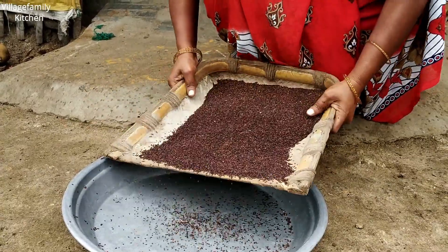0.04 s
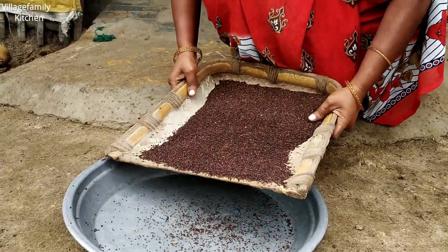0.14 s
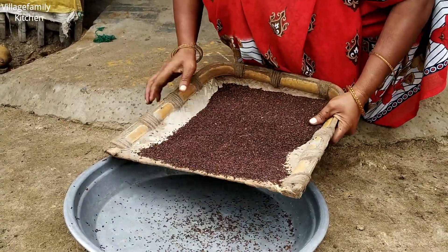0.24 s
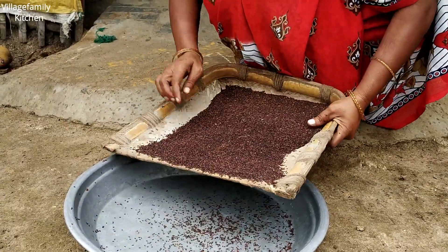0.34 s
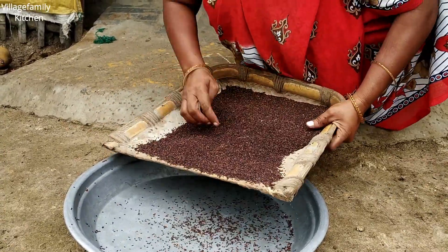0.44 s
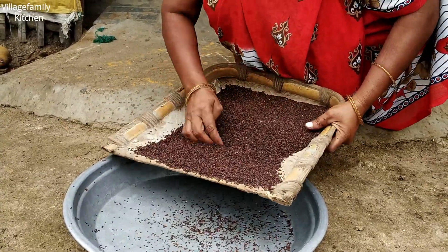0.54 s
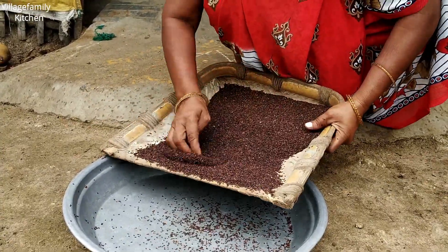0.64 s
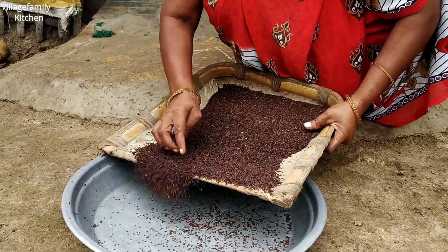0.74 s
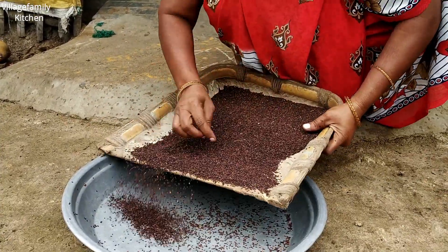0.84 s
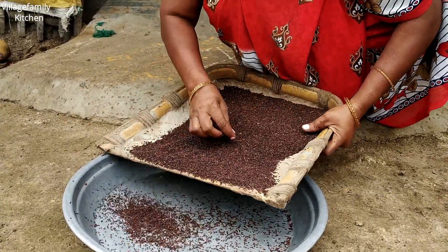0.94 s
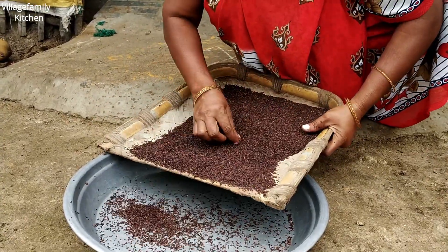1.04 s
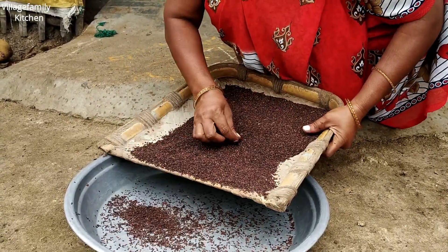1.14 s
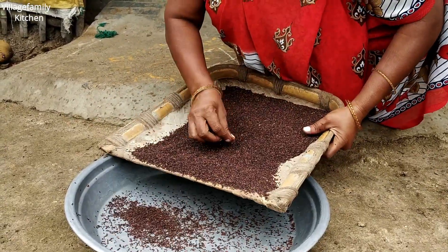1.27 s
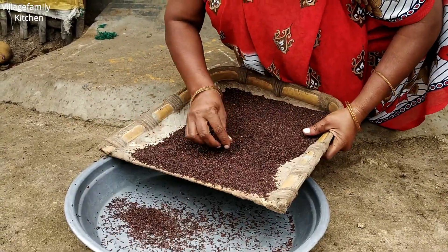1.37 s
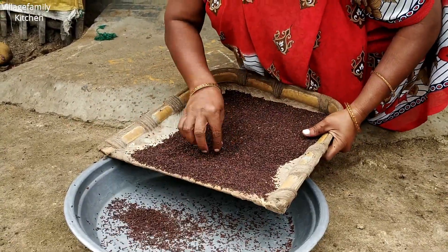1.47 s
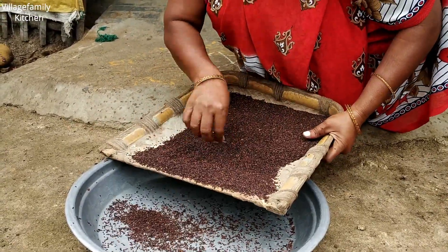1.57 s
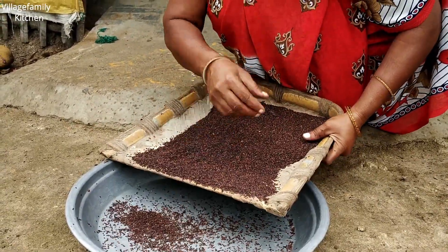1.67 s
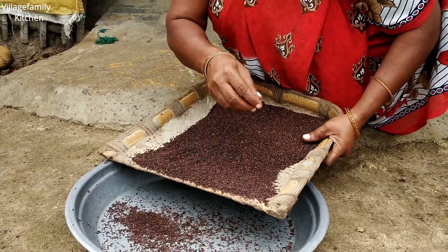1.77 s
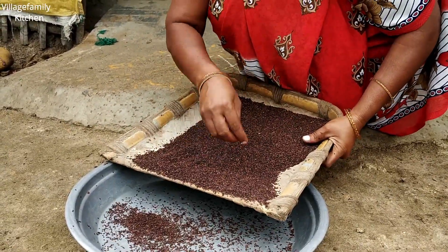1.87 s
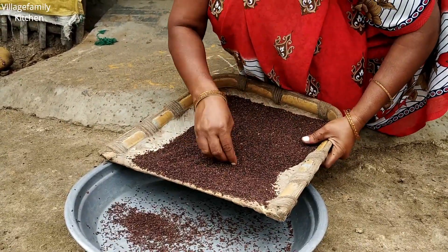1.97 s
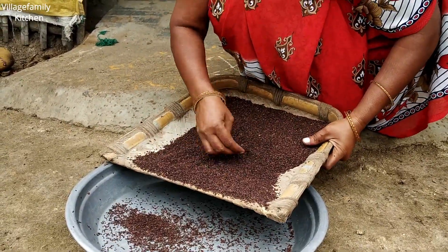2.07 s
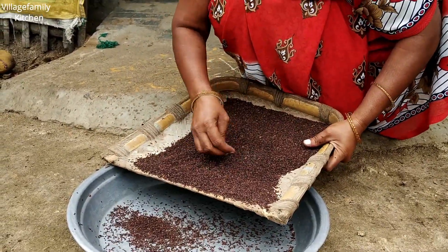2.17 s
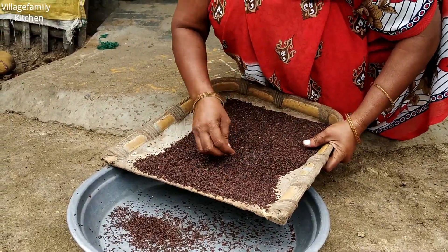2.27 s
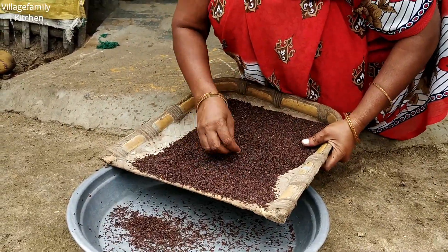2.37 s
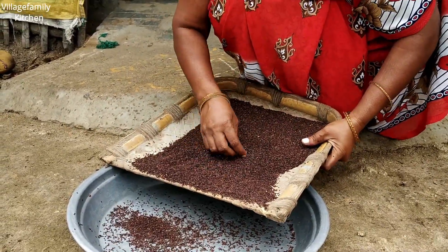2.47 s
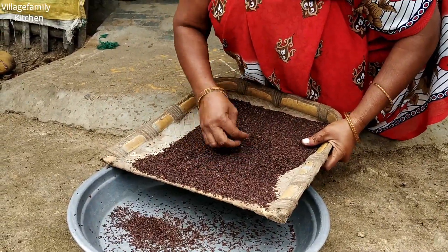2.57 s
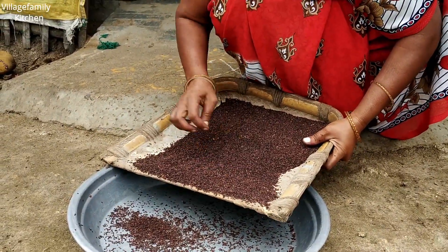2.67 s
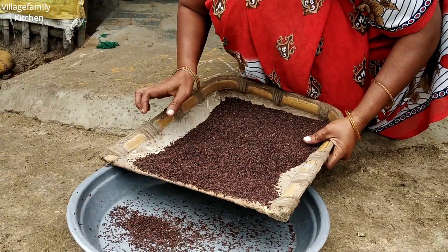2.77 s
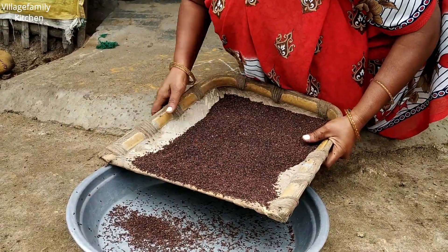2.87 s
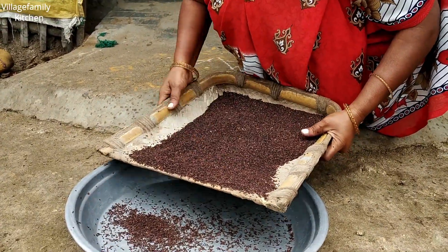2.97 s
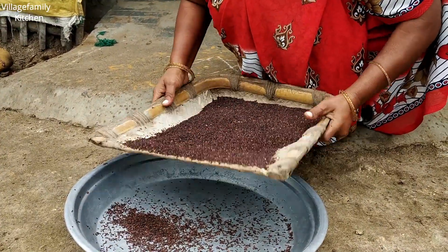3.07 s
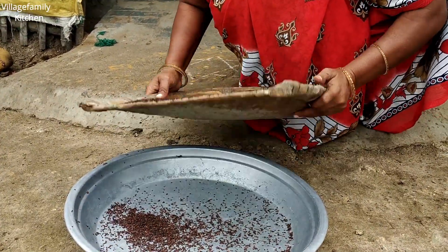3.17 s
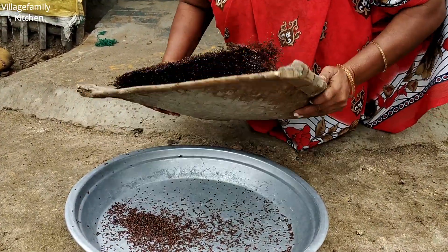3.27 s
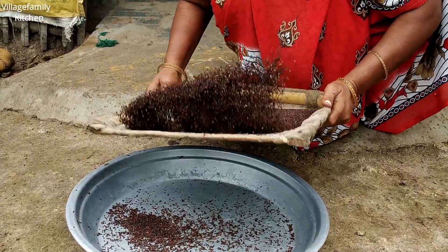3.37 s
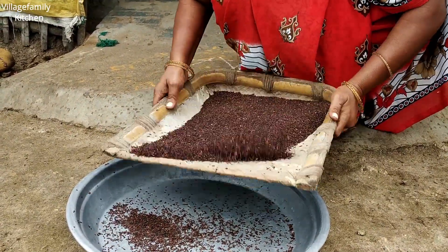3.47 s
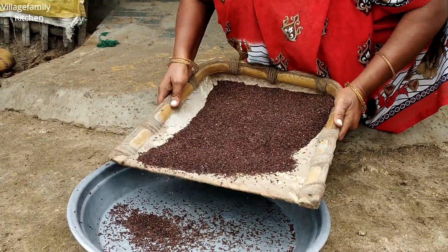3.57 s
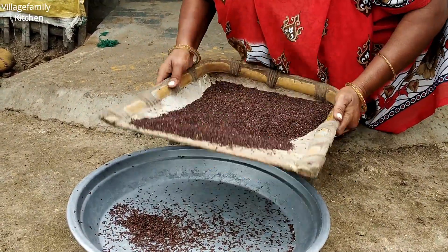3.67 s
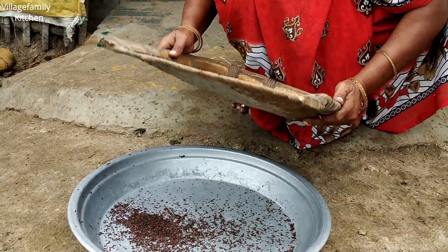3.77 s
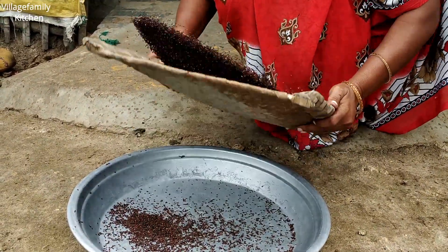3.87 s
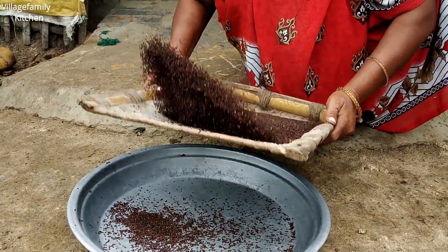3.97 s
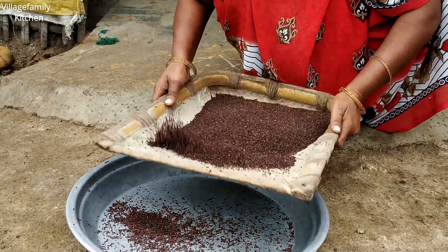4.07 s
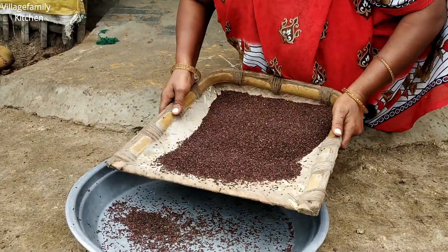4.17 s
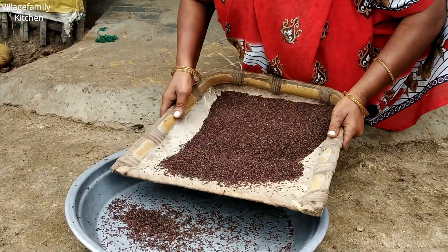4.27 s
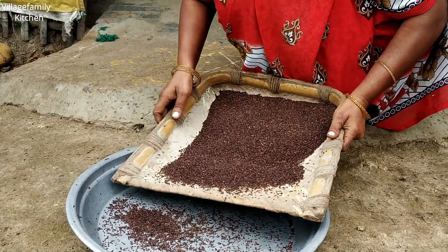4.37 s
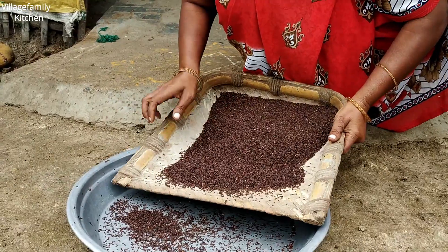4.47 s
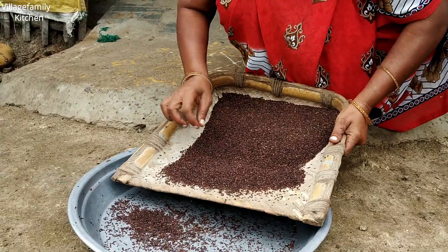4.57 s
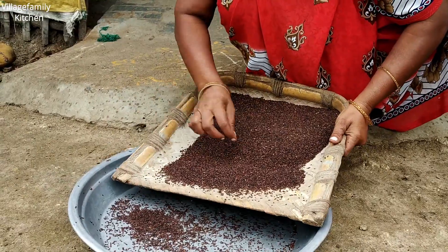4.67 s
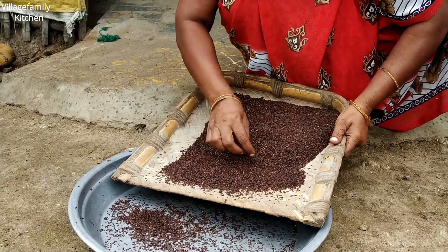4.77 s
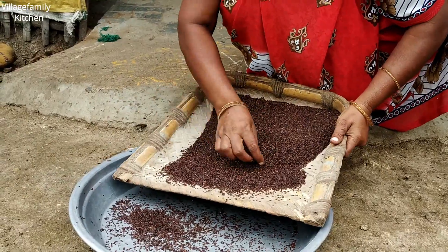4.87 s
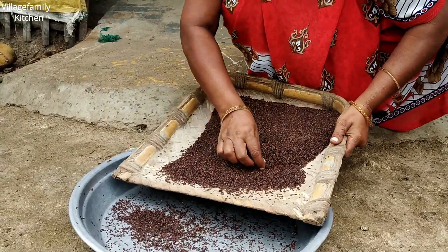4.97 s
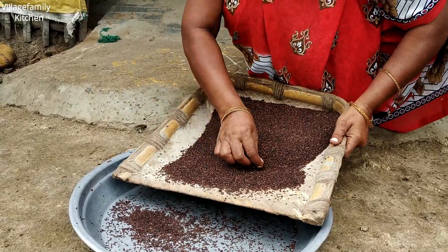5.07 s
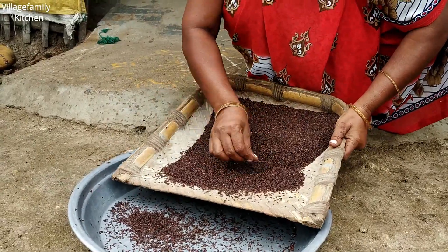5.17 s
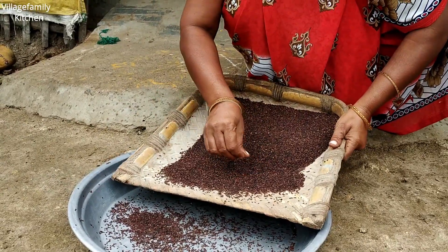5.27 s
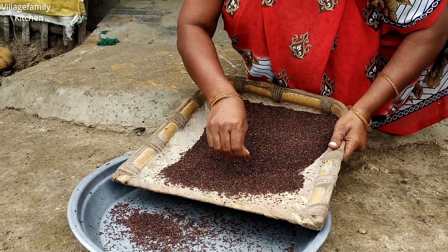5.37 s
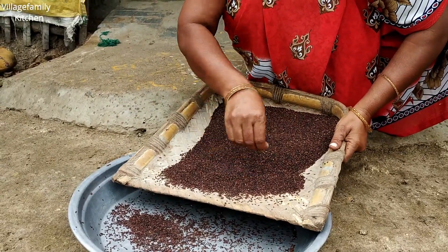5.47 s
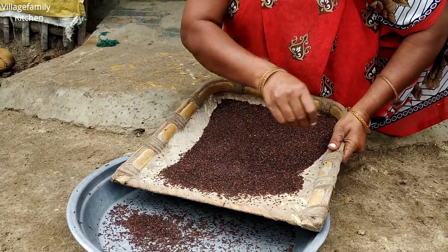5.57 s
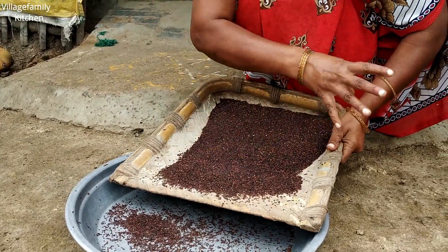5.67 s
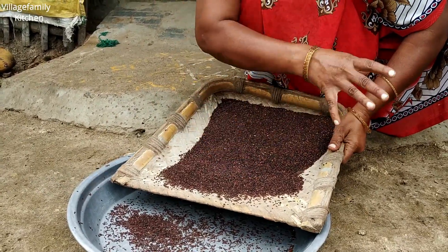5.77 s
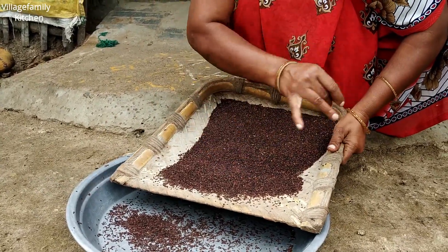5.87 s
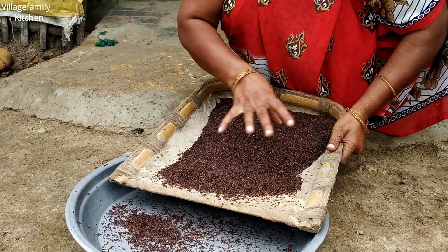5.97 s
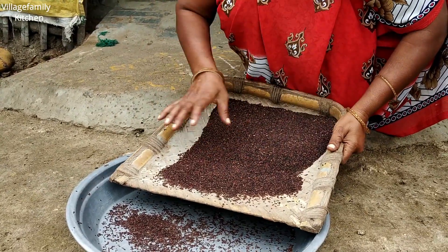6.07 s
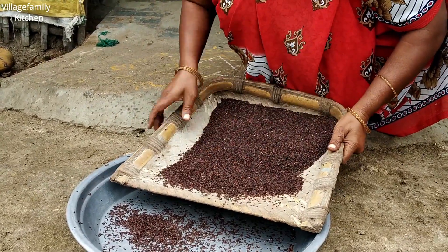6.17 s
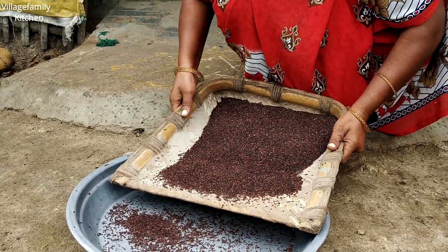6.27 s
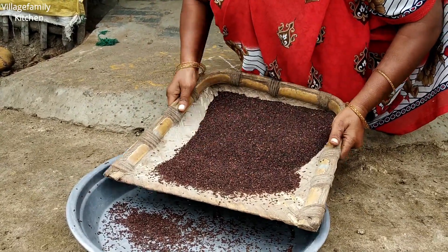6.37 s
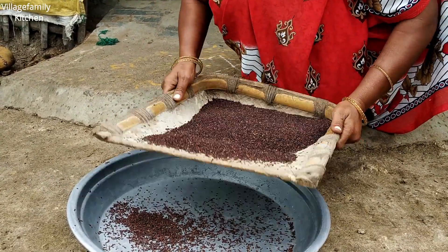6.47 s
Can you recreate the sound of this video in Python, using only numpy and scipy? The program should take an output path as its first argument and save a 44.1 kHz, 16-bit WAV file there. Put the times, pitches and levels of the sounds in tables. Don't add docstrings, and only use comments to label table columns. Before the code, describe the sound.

Bright granular seed noise, heard near a phone outdoors: an opening spill, a smaller one, then the loudest pour into a plastic tub, with dull tray bumps between. Soft finger rustles and flicks lead to a knocking lift, bangle clinks and two rushing tosses. The tray lands with heavy hollow thuds, then quiet stirring follows, ending in rim knocks, a rubbing scrape and more high glassy clinks over a faint hum.

```python
import sys
import numpy as np
from scipy import signal
from scipy.fft import rfft, irfft, next_fast_len
from scipy.io import wavfile
from scipy.ndimage import uniform_filter1d

SR = 44100
rng = np.random.default_rng(int(sys.argv[2]) if len(sys.argv) > 2 else 0)


def volts_from_db(level):
    exponent = np.asarray(level, float) / 20
    return 10 ** exponent


def wrap_up_sound(samples):
    columns = np.atleast_2d(samples).T
    tamed = np.clip(columns, -1, 1)
    steps = np.round(tamed * 32767).astype(np.int16)
    wavfile.write(sys.argv[1], SR, steps)


N = 287973
LONG = next_fast_len(N)

# (frequency [Hz], density [dB])
SEED_TONE = [(210, -70), (350, -11), (411, -24), (522, -13.5), (844, -7), (1010, -12.5), (1160, -7.5),
             (1520, -10), (1680, -9), (2670, -7), (3130, -2.5), (5140, -4), (8850, 1), (15000, -4),
             (16000, 2.5)]
# (full [s], rise [s], hold [s], fall [s], level [dB])
POURS = [
    (0.0, .02, 0.11, 0.33, -28),
    (0.495, 0.064, .1, 0.093, -30.5),
    (0.74, 0.014, 0.057, 0.3, -23.5),
    (1.32, 0.16, 0.04, 0.13, -41.5),
]
TOSSES = [
    (3.35, 0.1, 0.083, 0.075, -21.5),
    (3.93, 0.091, 0.094, 0.084, -22),
]
SLIDES = [(0.3, 0.08, 0.051, 0.032, -48), (0.66, .05, 0.073, 0.068, -45), (1.1, 0.3, 0.022, 0.12, -67),
          (3.21, 0.2, .03, .03, -52), (3.25, 0.0081, 0.074, 0.062, -38.5), (3.5, 0.039, 0.085, 0.29, -40),
          (3.78, 0.12, 0.094, 0.14, -52), (4.08, 0.019, 0.05, 0.12, -49.5)]
PINCHES = [(1.94, 0.12, 0.0068, 0.097, -42.5), (2.42, 0.014, 0.034, .05, -61.5),
           (2.7, 0.21, .05, .1, -59.5), (4.19, .01, 0.071, 0.17, -52), (4.935, 0.031, 0.017, 0.044, -49),
           (5.558, .07, 0.0087, 0.046, -64), (5.97, 0.15, 0.069, 0.28, -61.5)]
JOLTS = [(2.79, .02, 0.13, 0.09, -54), (4.44, 0.06, 0.096, 0.084, -50.5), (4.545, 0.016, .02, 0.077, -62),
         (6.2, 0.013, 0.014, 0.038, -79), (6.27, 0.015, 0.033, 0.044, -49.5), (6.36, .05, 0.14, .1, -43.5)]
SCRAPES = [(0.634, 0.091, 0.011, 0.16, -42), (1.095, 0.011, .11, 0.14, -43.5),
           (2.78, 0.027, .11, .12, -42.5), (4.56, .08, 0.033, .2, -41.5), (4.839, 0.1, .01, .08, -58),
           (6.2, 0.025, 0.0038, 0.087, -37), (6.37, 0.099, 0.011, .35, -32)]
RATTLES = [(2.8, .02, 0.064, .12, -41), (4.445, 0.023, .04, 0.21, -37), (4.55, 0.019, 0.018, 0.1, -39.5),
           (1.11, 0.022, .03, 0.13, -47), (6.27, .02, .02, 0.062, -38.5), (6.345, .02, 0.13, 0.12, -39)]
# (time [s], length
# [s], pitch [Hz], level [dB])
PUFFS = [(1.913, 0.065, 3440, -35), (2.41, .05, 3180, -48.5), (4.903, 0.11, 3750, -35),
         (0.464, 0.097, 710, -40.5), (1.922, 0.069, 655, -45.5), (4.921, 0.058, 630, -55)]
# (time [s], blow [dB], pitch [Hz], crack [dB])
THUDS = [(0.631, -21.5, 249, -50), (1.094, -18.5, 302, -53), (1.177, -32, 258, -64),
         (2.772, -26.5, 265, -64), (4.345, -24.5, 423, -41), (4.381, -7, 275, -45),
         (4.4062, -5.5, 286, -37), (4.445, -16.5, 330, -33.5), (4.492, -20, 332, -43.5),
         (4.521, -13, 310, -68), (5.379, -38, 282, -62), (5.591, -56, 250, -52), (6.214, -38, 262, -40),
         (6.329, -19, 262, -36), (6.37, -32, 253, -41), (6.428, -23, 296, -40), (6.445, -26, 250, -48)]
KNOCKS = [(0.6, -27, 576, -45), (2.797, -30, 810, -35), (2.862, -12, 680, -31.5), (2.879, -37, 800, -38),
          (2.936, -21.5, 780, -62), (4.432, -11.5, 710, -27), (4.542, -24, 865, -29.5),
          (6.188, -17.5, 531, -33), (6.2, -17.5, 1260, -28.5), (6.249, -7.5, 1124, -30),
          (6.264, -30, 556, -30.5), (6.355, -18, 885, -34.5), (6.516, -25, 900, -39)]
TICKS = [(4.189, -42, 270, -45), (4.221, -41, 890, -47), (4.246, -43, 1195, -45.5),
         (4.276, -40, 278, -43.5), (4.31, -38.5, 1210, -49), (3.578, -34, 896, -39)]
# (frequency [Hz], level [dB], 60 dB decay [s])
TUB = [(260, 0, .36), (328, -3, .2), (356, -4, .18), (420, -5, .16), (520, -7, .26), (608, -8, .24),
       (665, -6, .22), (760, -8, .2), (825, -9, .2), (920, -6, .16), (1090, -9, .16), (1300, -9, .12)]
# (time [s], top mode [dB], lowest mode [dB], three middle modes [dB])
CLINKS = [(1.6515, -47, -36, -53), (2.8675, -27, -28, -37), (2.9203, -23, -25, -41), (2.948, -40, -37, -53),
          (2.9818, -30, -31.5, -51), (3.7603, -20, -32.5, -39), (3.774, -30, -29.5, -43),
          (3.8112, -29, -28.5, -44), (3.8792, -25, -21, -21), (3.894, -27, -27, -34),
          (4.1909, -47, -59, -53), (4.2482, -48, -54, -49), (4.278, -45, -54, -50), (4.6164, -51, -43, -54),
          (5.664, -48, -42, -55), (5.7783, -52, -47, -54), (5.8257, -29, -39, -44),
          (6.2256, -38, -34.5, -47), (6.2623, -31, -25.5, -40), (6.2793, -25, -29, -39),
          (6.306, -31, -30, -47), (6.332, -29, -28.5, -39), (6.357, -27, -30, -44), (6.387, -29, -35, -45),
          (6.4198, -43, -50, -53)]
# (low [Hz], high [Hz], 60 dB decay [s])
BANGLE = [(15350, 15620, .035), (9590, 9730, .045), (11470, 11700, .035), (13600, 13750, .03),
          (14520, 14600, .035)]
# (frequency [Hz], level against the lowest mode [dB], 60 dB decay [s])
BANGLE_FAINT = [(4900, -9, .025), (8520, -8, .025), (10680, -6, .025)]
# (time [s], length [s], first pitch [Hz], last pitch [Hz], level [dB])
WHISTLES = [(5.458, .075, 2560, 2040, -59.5), (2.55, .1, 2600, 2520, -62), (2.2, .06, 2500, 2470, -64),
            (2.39, .05, 2480, 2460, -62), (4.97, .3, 792, 802, -68), (5.36, .04, 420, 700, -60)]
# (frequency [Hz], density [dB])
YARD = [(24, -66), (40, -38.5), (155, -5), (204, 3.5), (422, -9.5), (770, -11.5), (873, -17.5),
        (2380, -16.5), (4030, -17), (4930, -13.5), (8130, -22), (14800, -27.5), (16000, -28)]
# (frequency [Hz], likeness [0-1])
YARD_SAME = [(60, 0.99), (180, 0.91), (550, 0.25), (1650, 0.0061), (4970, 0.026), (15000, 0.059)]
# (frequency [Hz], likeness [0-1])
NEAR_SAME = [(60, 0.08), (180, 0.31), (550, 0.99), (1650, 0.83), (4970, 0.011), (15000, 0.013)]
# (frequency [Hz], left over right [dB])
PORTS = [(60, 19), (130, -4.5), (290, 0), (640, -2), (1410, -3), (3100, -0.5), (6820, -3), (15000, 8.5)]

FLAT_SIDE = dict(t60=0.054, top_db=2, grit=.15, ring_db=-22, modes=TUB)
HARD_RIM = dict(t60=0.039, top_db=-1.5, grit=.45, ring_db=-23, modes=TUB[4:])
CANE_END = dict(t60=0.14, top_db=11.6, grit=0.48, ring_db=-24, modes=TUB[4:])

SPAN_DB, RISE_BEND, FALL_BEND = 20, 1.5, 1.1
FOLLOW = (0.86, 0.88, 0.74)
FIZZ_LAG_S = 0.076
STILL_DB = -67.5
MOVEMENTS = ((POURS, (-5, -1.5, -10.5), -10), (TOSSES, (-9, -2.5, -14.5), -1),
             (SLIDES, (-1.5, -1.5, -5), -1), (PINCHES, (1, 0, -12), -1), (JOLTS, (1.5, -10, 9), -1))


def evened(x):
    return x / np.sqrt(np.mean(x ** 2) + 1e-20)


def read(points, hz):
    f, value = np.transpose(points)
    return np.interp(np.log(hz + 1), np.log(f + 1), value)


def add(mix, s, sound):
    part = mix[..., round(s * SR):][..., :sound.shape[-1]]
    part += sound[..., :part.shape[-1]]


def band(x, lo_hz, hi_hz):
    return evened(signal.sosfilt(signal.butter(2, [lo_hz, hi_hz], "band", fs=SR, output="sos"), x))


def paired(a, b, same):
    size = next_fast_len(len(a))
    likeness = np.clip(read(same, np.fft.rfftfreq(size, 1 / SR)), -1, 1)
    right = likeness * rfft(a, size) + np.sqrt(1 - likeness ** 2) * rfft(b, size)
    return np.array([a, irfft(right, size)[:len(a)]])


def placed(x):
    return paired(x, np.roll(x, rng.integers(2, 9)), NEAR_SAME)


def rung(x, modes, seconds):
    t = np.arange(round(seconds * SR)) / SR
    body = sum(volts_from_db(db - 60 * t / t60) * np.sin(2 * np.pi * hz * t) for hz, db, t60 in modes)
    return signal.fftconvolve(x, body)


def swell_db(t, full, rise, hold, fall):
    early = np.maximum(full - t, 0) / rise
    late = np.maximum(t - full - hold, 0) / fall
    return -SPAN_DB * (early ** RISE_BEND + late ** FALL_BEND)


def stirring():
    t = np.arange(0, N / SR + .01, .002)
    power = np.full((4, len(t)), volts_from_db(2 * STILL_DB))
    for rows, shares_db, dull_db in MOVEMENTS:
        for full, *shape, db in rows:
            drop = swell_db(t, full, *shape)
            gone = np.minimum(drop + SPAN_DB, 0)
            layers_db = db + gone + np.outer((1, *FOLLOW), drop - gone)
            layers_db += np.array([0, *shares_db])[:, None]
            layers_db[2] += dull_db * np.exp(-np.maximum(t - full, 0) / FIZZ_LAG_S)
            power += volts_from_db(2 * layers_db)
    return [np.interp(np.arange(N) / SR, t, 10 * np.log10(p)) for p in power]


def seeds(per_s=12000, spread_db=3.0, lumpy_db=0.92):
    tick_db, weave_db, fizz_db, body_db = stirring()
    hit, size, sign = rng.random((3, 2, N))
    sizes = volts_from_db(-spread_db * np.log(np.maximum(size, 1 / 30)))
    ticks = (hit < per_s / SR) * sizes * np.sign(sign - .5)
    ticks *= volts_from_db(lumpy_db * evened(uniform_filter1d(rng.standard_normal(N), 300)))
    hz = np.fft.rfftfreq(LONG, 1 / SR)
    z = rfft(paired(*ticks, NEAR_SAME), LONG) * volts_from_db(read(SEED_TONE, hz))
    below = [1 / (1 + (hz / edge_hz) ** 6) for edge_hz in (1500, 4800, 10200)]
    parts = [below[0], below[1] - below[0], below[2] - below[1], 1 - below[2]]
    levels = [body_db - 3.5, weave_db + 1.5, tick_db + 2.0, fizz_db + 7.0]
    return sum(volts_from_db(db) * evened(irfft(z * part, LONG)[:, :N]) for db, part in zip(levels, parts))


def patches(shape, bins, frames):
    hills = uniform_filter1d(rng.standard_normal(shape), bins, 0)
    return evened(uniform_filter1d(hills, frames, 1))


def shimmer(x, depth_db=2.0):
    hz, t, z = signal.stft(x, SR, nperseg=1024, noverlap=768)
    z = z * volts_from_db(depth_db * patches(z.shape[1:], bins=10, frames=9))
    return signal.istft(z, SR, nperseg=1024, noverlap=768)[1][:, :N]


def yard(level_db=-48, patchy_db=1.5):
    pair = paired(*rng.standard_normal((2, N)), YARD_SAME)
    colour = volts_from_db(read(YARD, np.fft.rfftfreq(LONG, 1 / SR)))
    hum = irfft(rfft(pair, LONG) * colour, LONG)[:, :N]
    return volts_from_db(level_db) * evened(shimmer(hum, patchy_db))


def seed_puff(s, seconds, hz, db):
    puff = band(rng.standard_normal(4000), 0.8 * hz, 1.2 * hz)[:round(seconds * SR)]
    return s, placed(volts_from_db(db) * puff * np.hanning(len(puff)))


def bump(s, blow_db, hz, crack_db, t60, top_db, grit, ring_db, modes):
    t = np.arange(round(.2 * SR)) / SR
    noise = rng.standard_normal((6, len(t)))
    thud = np.sin(2 * np.pi * hz * t) * volts_from_db(-60 * t / 0.063) + grit * band(noise[0], 400, 980)
    thud *= volts_from_db(blow_db - 4.5 - 60 * t / t60)
    shudder = volts_from_db(blow_db - 29.0 - 60 * t / 0.28) * band(noise[5], 510, 970)
    weave = band(noise[1], 1130, 3920) + 1.2 * band(noise[4], 2470, 4750)
    crack = volts_from_db(crack_db + 4.0) * weave
    crack += volts_from_db(crack_db + top_db + 0.5) * band(noise[2], 5000, 12300)
    ring = volts_from_db(blow_db + ring_db) * rung(noise[3, :12] / 3, modes, 0.3)
    add(ring, 0, thud + shudder + crack * volts_from_db(-60 * t / 0.039))
    return s + .0024, placed(ring)


def scrape(full, rise, hold, fall, db, modes=TUB[:1], damping=0.25):
    t = np.arange(full - 2 * rise, full + hold + 2 * fall, 1 / SR)
    rub = rng.standard_normal(SR)
    damped = [(hz, level, damping * t60) for hz, level, t60 in modes]
    hum = rung(rub, damped, .25)[SR // 4:][:len(t)]
    return t[0], placed(volts_from_db(db + swell_db(t, full, rise, hold, fall)) * evened(hum))


def clink(s, top_db, low_db, mid_db):
    t = np.arange(900) / SR
    hit, size = rng.random((2, len(t)))
    chatter = t / 0.0045 * np.exp(1 - t / 0.0021)
    touch = (hit < 1200 / SR) * (size - .5) * chatter
    lean = rng.random(5)
    mode_db = [top_db, low_db, *(mid_db + np.array((-4, 1, 3)))]
    modes = []
    for db, k, (low, high, t60) in zip(mode_db, lean, BANGLE):
        modes += [(high, db + 2.5, t60), (low, db + 2.5 - 1.9 * k, t60)]
    modes += [(hz, mode_db[1] + db, t60) for hz, db, t60 in BANGLE_FAINT]
    ring = rung(touch / (np.linalg.norm(touch) + 1e-9), modes, .15)
    add(ring, 0, volts_from_db(max(mode_db) - 2.5) * chatter * band(rng.standard_normal(len(t)), 8700, 17000))
    return s - .002, placed(ring)


def call(s, seconds, first_hz, last_hz, db, glide_s=.017):
    wander = evened(uniform_filter1d(rng.standard_normal(SR // 2), 300))
    t = np.arange(0, seconds, 1 / SR)
    hz = last_hz + (first_hz - last_hz) * np.exp(-t / glide_s)
    hz = hz * (1 + 0.006 * wander[:len(t)])
    whistle = np.sin(2 * np.pi * np.cumsum(hz) / SR)
    return s, volts_from_db(db + 5) * whistle * signal.windows.tukey(len(t), .3)


def ground(x, t60=.1, wet_db=-13.0):
    t = np.arange(round(.15 * SR)) / SR
    taps = rng.standard_normal((2, len(t))) * (rng.random((2, len(t))) < .05)
    taps *= volts_from_db(-60 * t / t60) * (t > .002)
    return x + volts_from_db(wet_db) * signal.oaconvolve(x, taps / np.linalg.norm(taps[0]), axes=1)[:, :N]


def scene():
    near = shimmer(seeds())
    for source, table in ((seed_puff, PUFFS), (scrape, SCRAPES), (clink, CLINKS), (call, WHISTLES)):
        for row in table:
            add(near, *source(*row))
    for row in RATTLES:
        add(near, *scrape(*row, modes=TUB[4:], damping=0.63))
    for table, kind in ((THUDS, FLAT_SIDE), (KNOCKS, HARD_RIM), (TICKS, CANE_END)):
        for row in table:
            add(near, *bump(*row, **kind))
    near = signal.sosfilt(signal.butter(2, 170, "high", fs=SR, output="sos"), near)
    return ground(near) + yard()


def thinned(x, thin_db=-29.0, weak_db=-24.0, above_hz=2600):
    hz, t, z = signal.stft(x, SR, nperseg=2048, noverlap=1536)
    power = (abs(z) ** 2).sum(0)
    near = uniform_filter1d(uniform_filter1d(power, size=11, axis=0), size=2, axis=1)
    near_db = 10 * np.log10(abs(near) + 1e-20)
    weak = near_db < uniform_filter1d(near_db, size=81, axis=0) - 2.9
    keep = np.where(weak, volts_from_db(weak_db), 1)
    keep *= np.where(power < .5 * near, volts_from_db(thin_db), 1)
    keep[hz < above_hz] = 1
    return signal.istft(z * keep, SR, nperseg=2048, noverlap=1536)[1][:, :N]


def band_limit(x):
    return signal.sosfilt(signal.butter(12, 16990, fs=SR, output="sos"), x)


def record(dry):
    hz = np.fft.rfftfreq(LONG, 1 / SR)
    top_cut = 1 / (1 + (hz / 15780) ** 400)
    colour = volts_from_db(np.outer([.5, -.5], read(PORTS, hz))) * top_cut
    mix = thinned(irfft(rfft(dry, LONG) * colour, LONG)[:, :N])
    return band_limit(mix)


dry = scene()
out = record(dry)
wrap_up_sound(out)
```